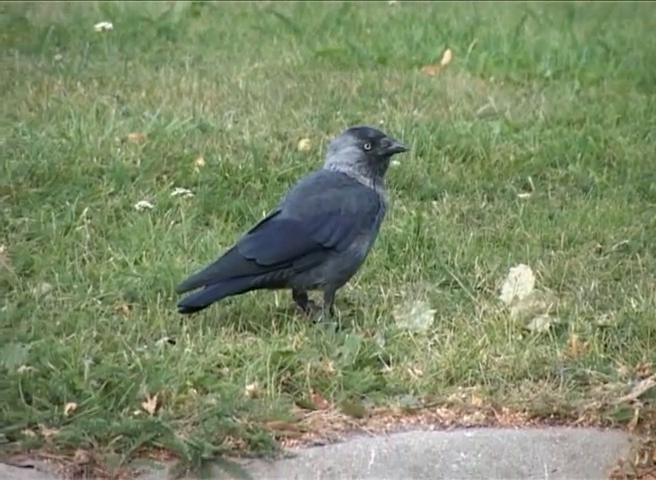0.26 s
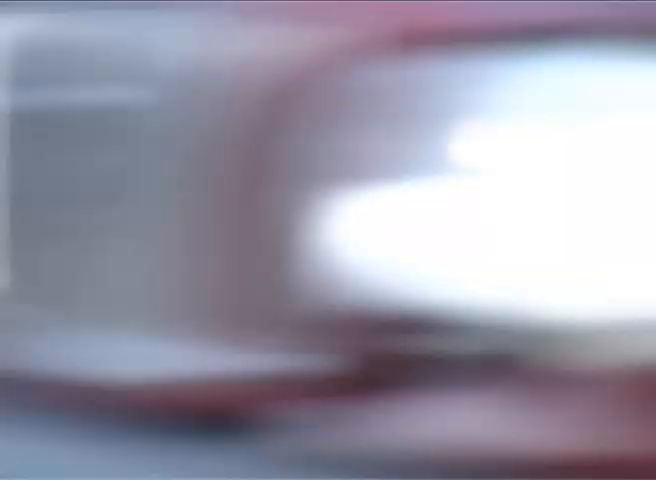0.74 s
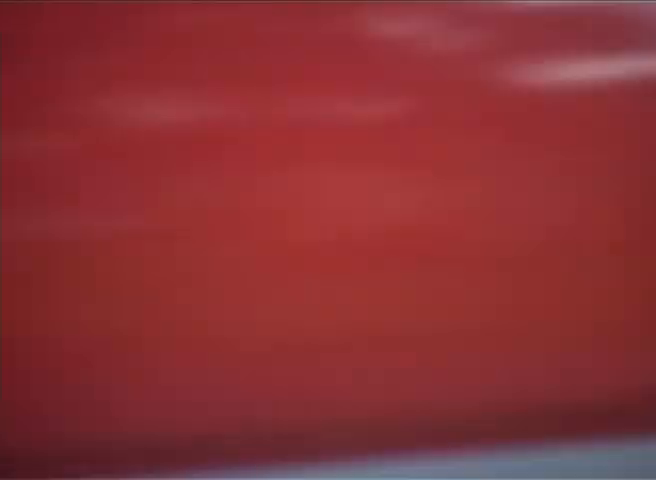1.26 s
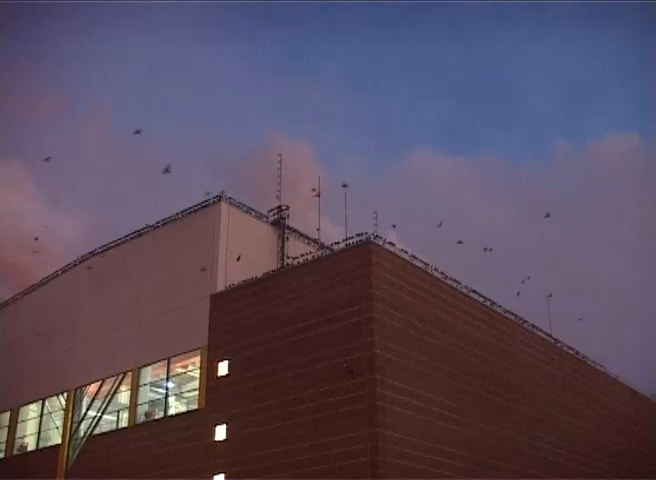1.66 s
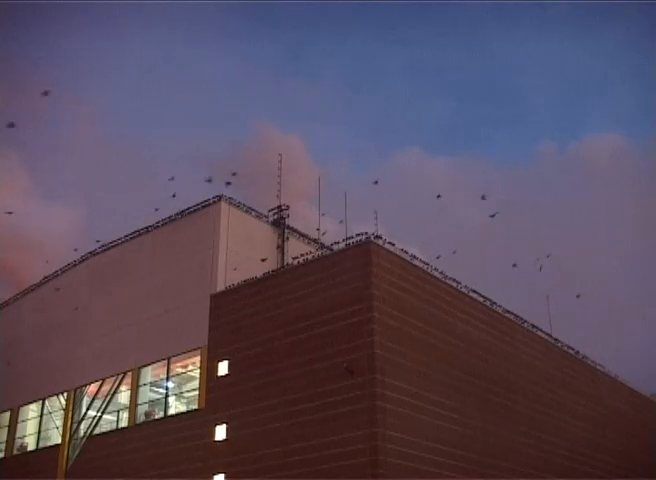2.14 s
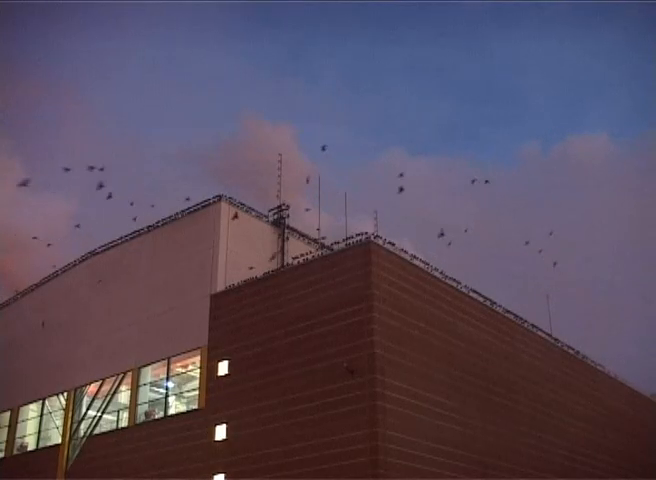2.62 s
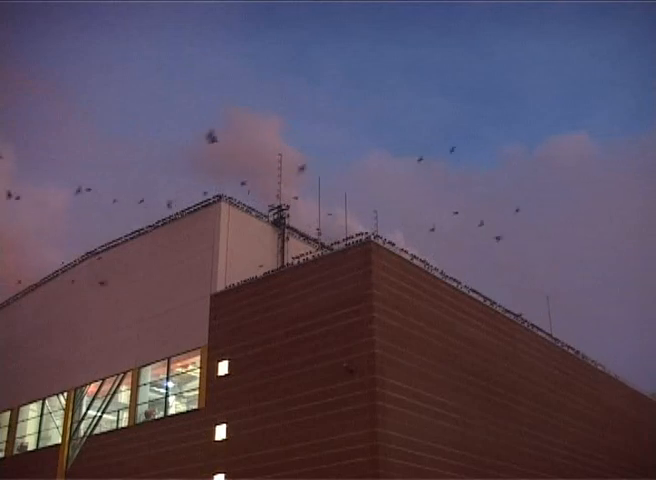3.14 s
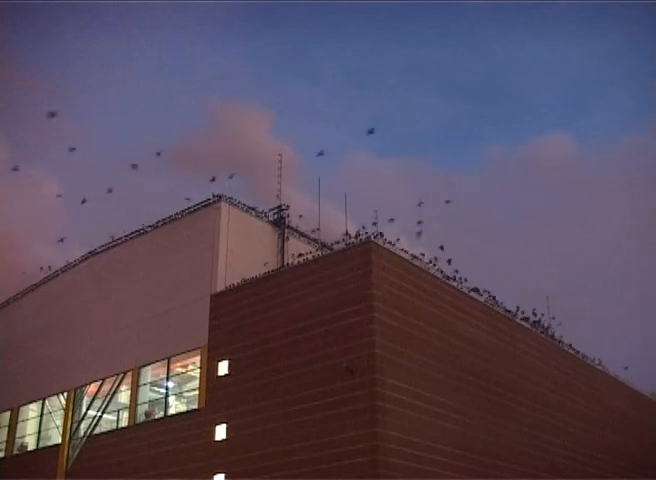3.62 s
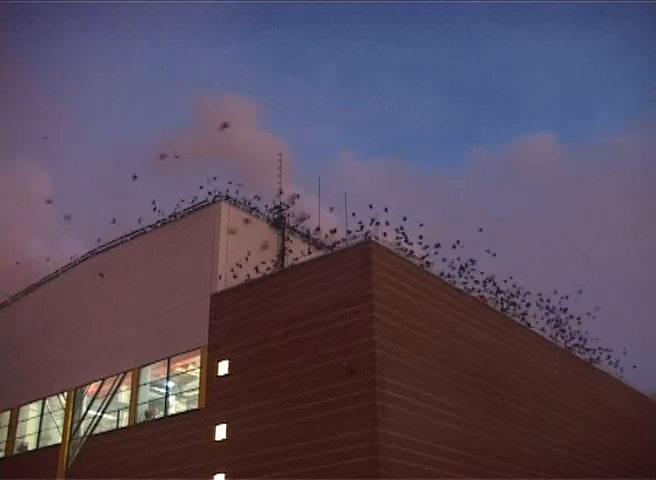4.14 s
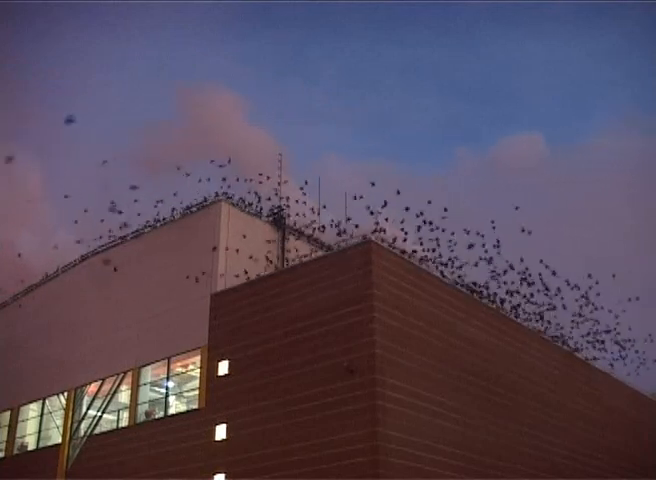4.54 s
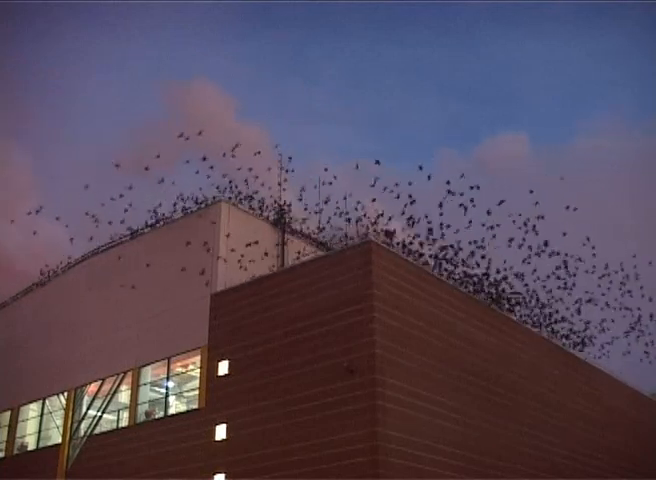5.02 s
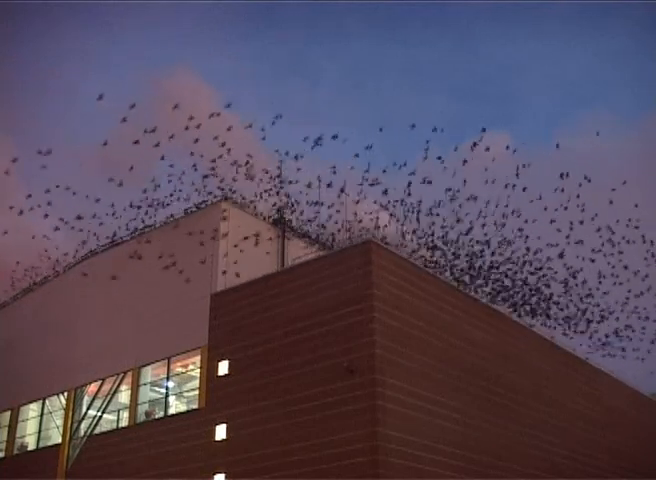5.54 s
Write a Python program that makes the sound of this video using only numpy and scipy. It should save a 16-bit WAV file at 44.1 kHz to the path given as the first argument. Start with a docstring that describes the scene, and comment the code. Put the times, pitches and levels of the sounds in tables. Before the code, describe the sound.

A car rolls close past an outdoor microphone, low engine drone and broad tyre roar peaking just before one second, with faint jackdaw calls. A hard cut brings dense, echoing jackdaw chatter from a high roof over soft city rumble. Midway, two loud plastic creaks burst close to the microphone; the flock swells at the end with faint wing swishes. A low camera motor hum runs throughout.

```python
"""Jackdaws at dusk: hundreds yelp from a high roof and take off with swishing wings; each yelp is a falling
harmonic tone shaped by throat and bill, with echoes from the walls, over a city rumble of coloured noise.
Before that, up to an abrupt change, a car rolls past close by (engine harmonics, tyre noise) with a few jackdaws.
Throughout: a camcorder motor (stepped hum). Its mount creaks twice (stick-slip ringing the casing);
soft rustles and ticks are filtered noise."""
import sys
import numpy as np
from scipy import signal
from scipy.fft import rfft, irfft
from scipy.io import wavfile
from scipy.ndimage import uniform_filter1d, minimum_filter1d

SR = 44100
rng = np.random.default_rng(int(sys.argv[2]) if len(sys.argv) > 2 else 0)


def pcm_store(signal):
    """Save signal as 16-bit PCM."""
    levels = np.round(np.clip(np.atleast_2d(signal), -1, 1) * 32767)
    wavfile.write(sys.argv[1], SR, levels.astype(np.int16).T)


N = 254898
TIME = np.arange(N) / SR

# All spectra: relative level; noise colours are per Hz.
# Whole flock: t/s, level/dB
FLOCK_T_DB = [(0, -42), (1.7, -44), (1.93, -35.5), (2.68, -35), (2.79, -38.5), (2.93, -31), (3.1, -38),
              (3.24, -34.5), (3.95, -35), (4.2, -38), (4.33, -34), (4.64, -37.5), (4.88, -34.5),
              (5.0, -36.5), (5.22, -34.5), (5.31, -30.5), (5.58, -31.5), (5.72, -28.5)]
# Nearest yelps: t/s, length/s, start f/Hz, fall/share, mid arch/share, level/dB, overtones/dB,
# bill resonance f/Hz, roughness/0-1
YELPS = [(0.141, 0.076, 1370, 0.077, 0.016, -41, -25, 5100, 0.38),
         (.3, 0.1, 1230, .08, .01, -42, -22, 4800, 0.4),
         (1.222, 0.048, 1400, 0.16, .01, -43, -19, 4900, .4),
         (1.384, .035, 1430, 0.053, .01, -49, -5, 4200, .4),
         (1.845, 0.062, 1410, 0.29, .025, -35, -11, 4000, 0.5),
         (1.899, 0.03, 1330, 0.093, .015, -37, -4.5, 5100, 0.08),
         (1.905, 0.021, 1060, .1, 0.019, -36, -18, 4100, .1),
         (1.939, 0.049, 1316, 0.17, .02, -38.5, -6, 5700, 0.6),
         (2.055, .03, 1370, .1, .01, -45, -16, 5600, .1), (2.107, .03, 1313, .15, .03, -35, -7, 5200, .25),
         (2.148, 0.037, 1322, 0.14, 0.018, -33, -8.5, 5570, 0.64),
         (2.256, 0.042, 1330, .18, 0.023, -35.5, -9, 5000, .5),
         (2.282, .025, 1104, .06, 0.0074, -38, -14, 4300, .5),
         (2.324, .032, 1593, .1, 0.028, -41, -4, 5600, 0.18),
         (2.497, 0.036, 1460, 0.2, 0.017, -38.5, -6, 5800, 0),
         (2.631, 0.051, 1197, 0.13, 0.016, -35, -9, 4800, .2),
         (2.646, .025, 1485, .12, 0.016, -46, -3, 5500, .2),
         (2.718, 0.023, 1390, .09, 0, -48, -6, 4000, .1), (2.86, 0.019, 1520, .03, .01, -50, -7, 6000, .15),
         (2.925, 0.034, 1130, 0.19, -0.011, -36.5, -22, 4700, .1),
         (3.052, 0.036, 1495, 0.15, 0.0043, -45, -8, 5600, .2),
         (3.083, .02, 1540, .06, 0.0028, -48.5, -4, 5700, .1),
         (3.151, 0.042, 1195, 0.17, .03, -34.5, -13, 4600, .2),
         (3.222, 0.034, 1230, .16, 0.008, -38, -18, 4600, .1),
         (3.252, 0.037, 1563, 0.17, .01, -39.5, -8, 5600, 0.7),
         (3.37, 0.075, 1270, .03, .02, -41, -8, 5200, .2),
         (3.455, .035, 1410, 0.042, 0, -42, -9, 4200, 0.24),
         (3.543, .03, 1357, 0.14, .01, -45, -16, 4800, .1),
         (3.581, .018, 1450, 0.12, -0.0087, -39, -14, 5500, .2),
         (3.619, 0.068, 1224, .13, 0.1, -34, -7.5, 5200, 0),
         (3.848, 0.06, 1245, .09, 0.028, -41, -2, 4970, .02),
         (3.881, 0.032, 1260, .05, .01, -32.5, -27, 6000, .2),
         (3.908, .05, 1395, .04, -.01, -47, -3, 4100, 0),
         (4.249, 0.034, 1430, 0.19, 0.015, -45, -4, 5300, 0.07),
         (4.262, .018, 1288, .06, .01, -36, -22, 5000, .3),
         (4.294, .025, 1460, .02, .01, -47, -3, 4300, .1),
         (4.37, 0.053, 1400, 0.032, -.02, -43, -3, 4100, .4),
         (4.438, .04, 1170, .19, .02, -41, -18, 4000, .05),
         (4.585, .03, 1350, 0.044, .015, -43, -3, 5350, .1),
         (4.605, 0.03, 1530, .08, 0.007, -46.5, -3, 4300, .1),
         (4.692, 0.04, 1455, 0.21, 0.049, -41.5, 2, 5600, 0.06),
         (4.721, 0.03, 1273, .22, 0.016, -37, -12, 5800, .02),
         (4.813, .018, 1130, .1, 0, -40, -20, 4500, .1), (4.828, .018, 1570, .08, .01, -51, -1, 6100, .1),
         (4.973, 0.018, 1480, 0.075, 0.0039, -47.5, -4, 4300, .1),
         (5.01, 0.034, 1480, 0.12, .01, -44, -8, 4200, 0.1),
         (5.07, .042, 1300, .19, 0.014, -35.5, -12, 4900, .55),
         (5.116, .035, 1352, .1, 0.0072, -36.5, -8, 4200, .2),
         (5.165, 0.032, 1390, 0.036, -0.011, -44, -3, 4100, 0.16),
         (5.284, 0.049, 1476, 0.12, 0.033, -39, -4.5, 5600, 0.72),
         (5.387, .02, 1547, 0.12, 0.015, -38, -2, 5600, 0.3),
         (5.401, 0.046, 1398, 0.15, .01, -29.5, -9, 4900, .95),
         (5.534, 0.042, 1540, 0.14, .02, -40.5, -9, 5830, .6),
         (5.6, 0.035, 1267, 0.11, 0.018, -39, -8, 4800, .1),
         (5.655, .05, 1300, 0.15, .02, -33.5, -7, 5500, 0.66),
         (5.745, 0.047, 1292, 0.21, 0.039, -32.5, -12, 4700, .5)]
# Jackdaw throat: f/Hz, level/dB
THROAT_HZ_DB = [(900, -0.5), (1400, -10.5), (1850, 2.5), (2300, 10.5), (2650, 7.5), (3150, -14), (4200, 7),
                (5200, -2), (6200, 4.5), (7000, -23), (8300, -23), (9200, -2), (11000, -18), (15000, -34.5)]
# Blur of the farthest birds: f/Hz, level/dB
BLUR_HZ_DB = [(700, -12.5), (1300, 0), (1900, -1.5), (2400, 3), (2700, -5.5), (3200, -18), (4200, -15.5),
              (5100, -16), (6100, -27), (7000, -28), (12000, -43)]
# Wings at take-off: t/s, level/dB
TAKEOFF_T_DB = [(4.8, -75), (5.22, -60), (5.42, -41.5), (5.52, -52), (5.7, -49)]
# Wing stroke colour: f/Hz, level/dB
SWISH_HZ_DB = [(1500, -18), (3200, 9), (4300, -3), (6000, 6), (7200, -14), (11000, -17), (15000, -30)]
# Car engine: t/s, firing f/Hz, level/dB
ENGINE_T_HZ_DB = [(0, 81.7, -45.5), (.2, 82.3, -39), (.27, 82.84, -38), (.6, 83.84, -40.5),
                  (.97, 84.6, -35), (1.1, 72.5, -47), (1.18, 67.9, -41), (1.27, 65.45, -53),
                  (1.54, 64.15, -44), (1.71, 63.3, -42.5)]
# Exhaust and body resonances: f/Hz, level/dB
EXHAUST_HZ_DB = [(80, -25), (128, -9), (141, 15), (165, -4.5), (205, -1), (252, 0), (335, -9), (415, 4),
                 (500, -72), (600, -1), (900, -31)]
# Tyre roar colour: f/Hz, level/dB
ROAR_HZ_DB = [(65, -40), (110, -14.5), (133, -15.5), (215, -6), (248, -3), (291, -5), (382, -5),
              (414, -6.5), (456, -5), (981, -1), (1440, -9), (2400, -8.5), (3050, -20), (5000, -32.5),
              (6500, -67.5), (11000, -120)]
# Tread hiss colour: f/Hz, level/dB
HISS_HZ_DB = [(2500, -4), (4000, 7.5), (5000, 1.5), (6200, 4.5), (7200, -3), (8700, -8.5), (9700, -3.5),
              (10400, -10.5), (11400, -3), (13500, -12), (15500, -19)]
# Thin singing note of the car, before random swell: t/s, level/dB
SING_T_DB = [(.62, -83), (.7, -58), (.85, -59), (.96, -53), (1.09, -53), (1.13, -80)]
# Mount creaks: t/s, length/s, slip rms before fade/dB, squeak/dB, fade over creak/dB, damping/multiple of casing's
CREAKS = [(3.752, 0.04, -17, 5.5, 0, 1), (3.997, .02, -27.5, 1, -4, 1.2),
          (4.028, 0.048, -22.5, -2, 5.5, 1.7), (4.078, 0.025, -29.5, -1, -1, 1.8),
          (4.107, 0.055, -30.5, -0.5, 9, 1.8)]
# Hard jerks in the creaks: t/s, peak/dB, squeak/dB
JERKS = [(3.7589, -5, 2), (3.7609, -6, 7), (3.7639, -5, 3), (3.7676, -5, 2), (3.7684, -2, 3),
         (3.7711, -5, 8), (3.7721, -7, 3), (3.7761, 0, 1), (3.7773, -7, 6), (3.7801, -8, 2),
         (3.7849, -1.5, 5), (3.984, -20, 0), (3.99, -21, 0), (4.0015, -8, 1), (4.0075, -11, -1),
         (4.0106, -11.5, 1), (4.0139, -9, 2), (4.0187, -9, 1), (4.025, -6, 0), (4.0266, -10, -1),
         (4.0304, -14, 3), (4.0354, -11.5, 0), (4.0403, -11, 2), (4.0448, -9.5, 2), (4.0498, -13, -1),
         (4.0557, -16, -1), (4.0659, -18, -2), (4.0833, -21, -2), (4.0978, -18, -1)]
# Plastic casing modes: f/Hz, width/Hz at damping 1, level/dB at squeak 0, gain per squeak/dB per dB
CASING_MODES = [(480, 570, -23, 0), (1160, 180, -10.5, -1), (1760, 320, -6, 3), (1980, 530, 9.5, 2.2),
                (2260, 1270, 7, 5.5), (3400, 340, -10.5, 2), (3650, 430, -9.5, 1.5), (4600, 640, -21, -1),
                (5640, 700, -38, -5), (7600, 270, -30, 0), (9240, 500, -22.5, 0)]
# Hiss of the sliding joint: f/Hz, level/dB
SCRAPE_HZ_DB = [(2000, 1), (5000, 8.5), (8000, -3), (10500, -7), (13000, -6), (15500, -14)]
# Rustles close to the microphone: t/s, length/s, nominal level/dB
RUSTLES = [(2.42, 0.13, -57), (3.15, 0.65, -58), (4.07, 0.11, -46.5), (4.263, 0.2, -49),
           (4.858, 0.075, -49), (5.27, 0.39, -58), (5.627, 0.13, -46)]
# Light casing ticks: t/s, nominal level/dB
TICKS_T_DB = [(2.454, -32), (2.566, -33), (3.142, -33), (3.522, -37.5), (4.669, -33), (4.808, -26),
              (5.392, -33)]
# Rustle and tick colour: f/Hz, level/dB
RUSTLE_HZ_DB = [(2000, -21), (4000, 29.5), (6000, -2.5), (7700, 17.5), (8400, -23), (9300, -1),
                (11000, 12.5), (13000, -10), (15500, -25)]
# Camcorder motor, held until the next step: t/s, level/dB
MOTOR_T_DB = [(0, -52), (.75, -57), (1.39, -44.5), (3.25, -43), (3.47, -50.5), (4.05, -42.5), (4.37, -45.5),
              (5.36, -41.5)]
# Motor partials: multiple of MOTOR_HZ, relative level/dB
MOTOR_PARTIALS_DB = [(1, 3), (3, -6), (5, -13.5)]
# City rumble colour: f/Hz, level/dB
CITY_HZ_DB = [(30, -24), (90, -10), (140, -4), (220, -1), (380, 0.5), (600, -1.5), (1100, -3.5),
              (2000, -1.5), (3300, -12.5), (6000, -24.5), (8300, -35), (9300, -36), (12500, -35.5),
              (15500, -57)]

CUT_S = 1.712  # street gives way to roost
BILL_HALF_WIDTH_HZ, BILL_SKIRT = 770, .19  # skirt: share added at all frequencies
WINGBEAT_HZ = 6  # mean; each wing is within 20 %
PASSES_S, SPEED_M_S, NEAREST_M = .86, 5.85, 1.47  # car's straight path past the microphone
ROAR_DB, ROAR_FALL_DB = -30, 1.18  # at nearest point; loss per doubling of distance
HISS_DB, HISS_FALL_DB = -47, 2.5
HISS_SHADOW_DB, SHADOW_S = 3, .19  # body shades the hiss once past; ramp length
ABREAST_S, ABREAST_WIDTH_S, ABREAST_DB = .96, .14, 3.6  # hiss flare with the wheels abreast
SING_HZ, SING_WANDER_HZ = 6270, 90
WHINE_HZ, WHINE_DB = 15625, -79
SLIPS_PER_S = 1000
MODE_SCATTER_DB, MODE_DETUNE = 3, .035  # rms per ring; detune is a share of the mode's pitch
TIGHT_PITCH_PER_DB = .0259  # share of pitch per dB of squeak
LET_GO_S = .00066  # at damping 1
MOTOR_HZ, MOTOR_STEP_S = 24.5, .036
TOP_HZ = 15700


def undb(db):
    """Decibels to gain."""
    return 10 ** (np.asarray(db) / 20)


def unit(x):
    """Scale to rms 1."""
    return x / np.sqrt(np.mean(x ** 2) + 1e-18)


def curve(table, column=1):
    """One column, linear in time."""
    rows = np.array(table)
    return np.interp(TIME, rows[:, 0], rows[:, column])


def response(spectrum, hz):
    """Gain of a (Hz, dB) spectrum at hz, linear in dB over log frequency."""
    points_hz, db = np.transpose(spectrum)
    return undb(np.interp(np.log(hz + 1), np.log(points_hz), db))


def noise(spectrum):
    """Noise of that colour, rms 1."""
    white = rfft(rng.standard_normal(N))
    return unit(irfft(white * response(spectrum, np.fft.rfftfreq(N, 1 / SR)), N))


def walk(rate_hz, size=N):
    """Random values joined by lines, rate_hz points a second, rms near 1."""
    place = np.arange(size) * rate_hz / SR + rng.random()
    points = rng.standard_normal(size // 10 + 2)
    return np.sqrt(3 / 2) * np.interp(place, np.arange(len(points)), points)


def add(out, start_s, sound):
    """Mix in at start_s, clipped to the ends."""
    i = int(start_s * SR)
    lo, hi = max(i, 0), min(i + len(sound), N)
    if hi > lo:
        out[lo:hi] += sound[lo - i:hi - i]


def echoes(x, t60_s, delay_s):
    """Scattered reflections: decaying noise tail of unit energy."""
    t = TIME[:SR]
    tail = rng.standard_normal(SR) * np.exp(-np.log(1000) * t / t60_s) * (t > delay_s)
    return signal.fftconvolve(x, tail / np.linalg.norm(tail))[:N]


def yelp(length_s, start_hz, fall, arch, overtones_db, bill_hz, rough):
    """One 'kya', rms 1: pitch slides down as the bill closes; an unsteady syrinx smears the harmonics."""
    size = int(max(length_s, .01) * SR)
    u = np.linspace(0, 1, size)
    shake, rasp = walk(900, size=size), walk(700, size=size)
    glide = 1 - fall * u + arch * 4 * u * (1 - u)
    hz = start_hz * glide * (1 + .07 * rough * shake)
    k = np.arange(1, 9)[:, None]
    # weights every 32 samples; the bill resonance picks out overtones above the second harmonic
    partial_hz = k * hz[::32]
    resonance = 1 / (1 + ((partial_hz - bill_hz) / BILL_HALF_WIDTH_HZ) ** 2)
    bill = undb(overtones_db) * (BILL_SKIRT + resonance)
    weights = response(THROAT_HZ_DB, partial_hz) * np.where(k > 2, bill, 1)
    phase = (2 * np.pi * np.cumsum(hz) / SR).astype(np.float32)
    harmonics = np.repeat(weights, 32, axis=1)[:, :size] * np.sin(k * phase)
    swell = np.sqrt(np.abs(np.sin(np.pi * u)))
    return unit(harmonics.sum(axis=0) * swell * (1 + .5 * rough * rasp))


def flock(count=900):
    """Hundreds of short, mostly hoarse calls, denser as the level rises; the farthest melt into a noise blur."""
    level = undb(curve(FLOCK_T_DB))
    crowding = np.cumsum(level) / np.sum(level)
    calls = np.zeros(N)
    evens = rng.random((count, 5))
    spreads = np.tanh(rng.standard_normal((count, 4)))
    for i, (even, spread) in enumerate(zip(evens, spreads)):
        when, long, fall, rough, bend = even
        pitch, near, bright, bill = spread
        voice = yelp(.018 + .035 * long ** 2, 1270 * np.exp(.17 * pitch), .03 + .1796 * fall,
                     .04 * bend ** 2, -13.5 + 2 * bright, 4800 + 1200 * bill, .15 + .6 * rough)
        start_s = np.searchsorted(crowding, (i + when) / count) / SR - .02
        add(calls, start_s, undb(4 * near) * voice)
    calls = unit(calls / np.sqrt(level))  # crowding already carries part of the level
    chatter = undb(-2.4) * calls + undb(-12) * echoes(calls, t60_s=.8, delay_s=.02)
    blur = undb(-4.5 + walk(25)) * noise(BLUR_HZ_DB)
    return (chatter + blur) * level


def near_birds():
    """Single calls that stand out, with a little echo from the facade."""
    out = np.zeros(N)
    for start_s, length_s, hz, fall, arch, db, overtones_db, bill_hz, rough in YELPS:
        add(out, start_s, undb(db) * yelp(length_s, hz, fall, arch, overtones_db, bill_hz, rough))
    return out + undb(-14) * echoes(out, t60_s=.5, delay_s=.03)


def wings(count=14):
    """Take-off: wings beat out of step, each stroke a short swish of noise."""
    strokes = np.zeros(N)
    for pace, start in rng.random((count, 2)):
        beat = np.sin(2 * np.pi * (WINGBEAT_HZ * (.8 + .4 * pace) * TIME + start))
        strokes += np.maximum(beat, 0) ** 12
    return noise(SWISH_HZ_DB) * unit(strokes) * undb(curve(TAKEOFF_T_DB))


def engine():
    """Ten firing harmonics slide through fixed exhaust resonances."""
    hz = curve(ENGINE_T_HZ_DB) * (1 + .004 * walk(15))
    phase = 2 * np.pi * np.cumsum(hz) / SR
    out = np.zeros(N)
    for k in range(1, 11):
        gain = response(EXHAUST_HZ_DB, k * hz) * undb(2 * walk(10.4))
        out += gain * np.sin(k * phase + 2 * np.pi * rng.random())
    return unit(out) * undb(curve(ENGINE_T_HZ_DB, column=2))


def tyres():
    """Roar and hiss fall with distance; the body shades the hiss behind the car."""
    past_s = TIME - PASSES_S
    doublings = np.log2(np.hypot(SPEED_M_S * past_s, NEAREST_M) / NEAREST_M)
    behind = np.clip(past_s / SHADOW_S - .5, 0, 1)
    abreast = np.exp(-((TIME - ABREAST_S) / ABREAST_WIDTH_S) ** 2)
    roar_db = ROAR_DB - ROAR_FALL_DB * doublings + .37 * walk(13.03)
    hiss_db = HISS_DB - HISS_FALL_DB * doublings - HISS_SHADOW_DB * behind + ABREAST_DB * abreast
    return noise(ROAR_HZ_DB) * undb(roar_db) + noise(HISS_HZ_DB) * undb(hiss_db)


def car():
    """Engine, tyres and a thin singing note of wandering pitch and strength."""
    sing_phase = 2 * np.pi * np.cumsum(SING_HZ + SING_WANDER_HZ * walk(600)) / SR
    sing = np.sin(sing_phase) * walk(150) * undb(curve(SING_T_DB))
    return engine() + tyres() + sing


def whine():
    """Thin electronic whine in the street: a steady sine."""
    return undb(WHINE_DB) * unit(np.sin(2 * np.pi * WHINE_HZ * TIME))


def casing(squeak_db, damping=1):
    """Ring after one jerk, peak 1: a tight joint rings higher and brings out middle modes; damping shortens it."""
    t = TIME[:SR // 80]
    ring = np.zeros(len(t))
    scatter = rng.standard_normal((len(CASING_MODES), 2))
    for (hz, width_hz, db, share), (strong, sharp) in zip(CASING_MODES, scatter):
        gain = undb(db + share * squeak_db + MODE_SCATTER_DB * strong)
        mode_hz = hz * (1 + TIGHT_PITCH_PER_DB * squeak_db + MODE_DETUNE * sharp)
        ring += gain * np.exp(-np.pi * width_hz * damping * t) * np.sin(2 * np.pi * mode_hz * t)
    give = 1 - np.exp(-(t * damping / LET_GO_S) ** 2)  # joint lets go gradually
    ring = signal.lfilter(*signal.butter(2, 450, "high", fs=SR), ring * give)
    return ring / np.abs(ring).max()


def mount(count=64):
    """Stick-slip: the joint loads and jerks free, with uneven small slips between; each rings the casing."""
    out = np.zeros(N)
    for start_s, length_s, db, squeak_db, fade_db, damping in CREAKS:
        run = np.zeros(N)
        gaps = rng.uniform(.3, 1.7, count)
        forces = rng.choice([-1, 1], count) * rng.uniform(.2, 1, count)
        for when_s, force in zip(np.cumsum(gaps) / SLIPS_PER_S, forces):
            if when_s < length_s:
                swell = np.sin(np.pi * when_s / length_s) ** .31
                add(run, start_s + when_s, force * swell * casing(squeak_db, damping))
        run *= undb(db) * np.sqrt(length_s * SR / np.sum(run ** 2))
        out += run * undb(-fade_db * np.clip((TIME - start_s) / length_s, 0, 1))
    for start_s, db, squeak_db in JERKS:
        add(out, start_s, undb(db) * casing(squeak_db))
    # surfaces hiss while they slide
    sliding = np.sqrt(np.abs(uniform_filter1d(np.abs(out), size=200)))
    scrape = undb(-31) * sliding * noise(SCRAPE_HZ_DB) * undb(1.2 * walk(500))
    close_echo = undb(-15) * echoes(out, t60_s=.02, delay_s=.001)
    far_echo = undb(-26) * echoes(out, t60_s=.25, delay_s=.01)
    return out + scrape + close_echo + far_echo


def handling():
    """Grainy rustles and dry ticks at the microphone: noise under swells and fast decays."""
    swell, ticks = np.zeros(N), np.zeros(N)
    for start_s, length_s, db in RUSTLES:
        add(swell, start_s, undb(db) * np.sqrt(np.hanning(int(length_s * SR))))
    for start_s, db in TICKS_T_DB:
        add(ticks, start_s, undb(db) * np.exp(-TIME[:SR // 20] / .0037) / 2)
    grain = undb(4 * walk(300))
    return noise(RUSTLE_HZ_DB) * (swell * grain + ticks)


def motor():
    """Camcorder's low hum: a few harmonics, stepping in strength."""
    starts_s, levels_db = np.transpose(MOTOR_T_DB)
    held_db = levels_db[np.searchsorted(starts_s[1:], TIME)]
    strength = undb(uniform_filter1d(held_db, size=int(MOTOR_STEP_S * SR)))
    phase = 2 * np.pi * MOTOR_HZ * TIME
    hum = sum(undb(db) * np.cos(round(k) * phase) for k, db in MOTOR_PARTIALS_DB)
    return unit(hum) * strength


def city():
    """Distant traffic and ventilation: nearly steady coloured noise."""
    return noise(CITY_HZ_DB) * undb(-37 + .59 * walk(5))


def scene():
    """Street first, roost after; jackdaws in both."""
    street = np.clip((CUT_S - TIME) / .011 + .5, 0, 1)
    birds = flock() + near_birds() + wings()
    places = street * (car() + whine()) + (1 - street) * city()
    camcorder = mount() + handling() + motor()
    return (birds + places + camcorder)[None]


def record(dry):
    """Limiter holds peaks to .98 of full scale; a steep low-pass then cuts the top."""
    room_left = 1 / np.maximum(np.abs(dry) / .98, 1)
    gain = uniform_filter1d(minimum_filter1d(room_left, size=89), size=89)
    low_pass = signal.ellip(8, .2, 80, TOP_HZ, fs=SR, output="sos")
    return signal.sosfilt(low_pass, gain * dry)


dry = scene()
out = record(dry)
pcm_store(out)
```